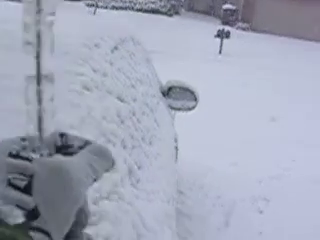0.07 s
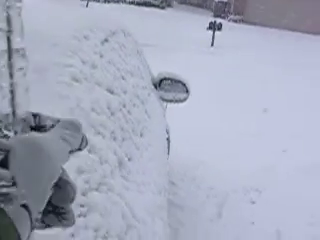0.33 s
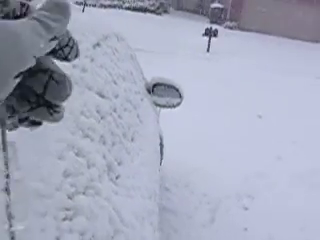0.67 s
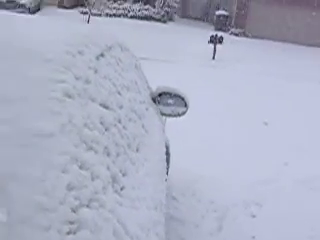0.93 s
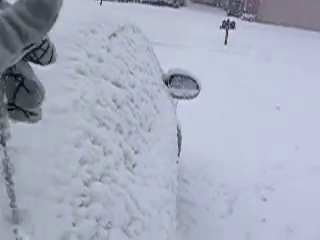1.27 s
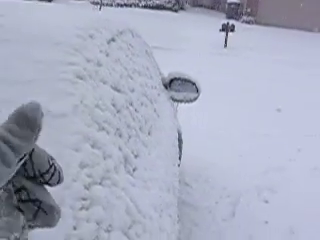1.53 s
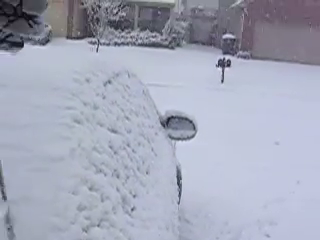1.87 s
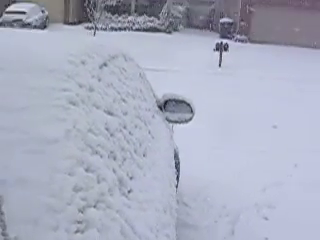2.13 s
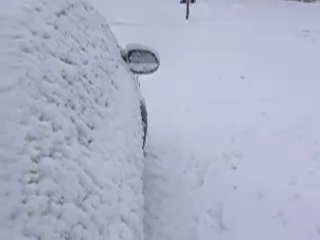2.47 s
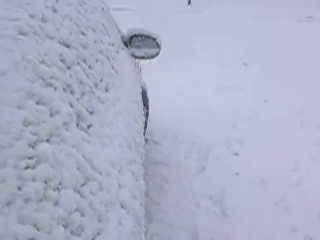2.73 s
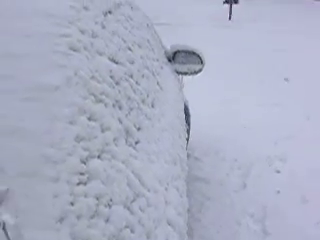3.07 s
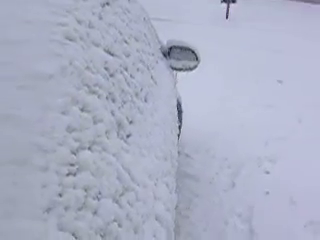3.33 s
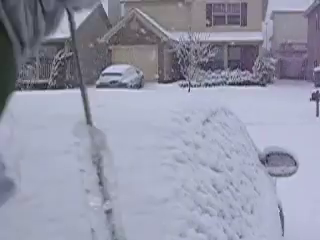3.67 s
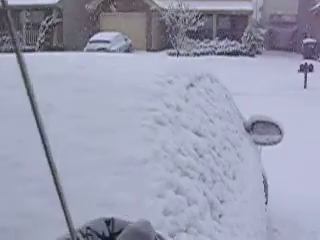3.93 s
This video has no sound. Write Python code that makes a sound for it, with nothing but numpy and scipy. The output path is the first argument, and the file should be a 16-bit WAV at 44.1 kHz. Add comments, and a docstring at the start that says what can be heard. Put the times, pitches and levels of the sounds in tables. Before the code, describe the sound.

Ice snaps and crumbles in uneven bursts while a glove scrapes along a car antenna, making the rod rattle briefly. The cracks grow sparser and softer later. Low wind buffets the close, dull-sounding microphone in a snowy yard.

```python
"""Stripping ice from a car antenna

A gloved hand rubs along the rod, close to a small camera in a snowy yard, while wind blows throughout.
The ice crumbles in crunches of tiny fractures and snaps in short dry cracks that set the rod ringing.
The camera passes only a narrow band, and the hardest cracks overload it."""
import sys
import numpy as np
from scipy import signal
from scipy.fft import rfft, irfft, next_fast_len
from scipy.io import wavfile

SR = 44100
rng = np.random.default_rng(int(sys.argv[2]) if len(sys.argv) > 2 else 0)


def log_audio(samples):
    """Write samples as a 16-bit WAV file to the path given in sys.argv[1]."""
    # one column per channel
    frames = np.atleast_2d(samples).T
    # limit to full scale, then quantise
    limited = np.clip(frames, -1, 1)
    pcm = np.round(limited * 32767).astype(np.int16)
    wavfile.write(sys.argv[1], SR, pcm)


N = 4 * SR


def amp(db):
    return 10 ** (np.asarray(db) / 20)


def unit_rms(x):
    return x / np.sqrt(np.mean(x ** 2) + 1e-20)


def unit_burst(x):
    """Scale x to the energy of 5 ms at rms 1."""
    return x / np.sqrt(np.sum(x ** 2) / (.005 * SR) + 1e-20)


def curve(rows):
    """Interpolate (seconds, value) rows to one value per sample."""
    return np.interp(np.arange(N) / SR, *np.transpose(rows))


def wobble(knots_per_s):
    """Straight lines between Gaussian random knots."""
    knots = rng.standard_normal(1024)
    return np.interp(np.arange(N) * knots_per_s / SR, np.arange(len(knots)), knots)


def coloured(x, colour):
    """Minimum-phase filter through (Hz, dB) points."""
    size = 4096
    hz, db = np.transpose(colour)
    gain = amp(np.interp(np.log(np.fft.rfftfreq(size, 1 / SR) + 1), np.log(hz), db))
    cepstrum = irfft(np.log(gain))
    cepstrum[1:size // 2] *= 2
    cepstrum[size // 2 + 1:] = 0
    response = irfft(np.exp(rfft(cepstrum)))
    return signal.oaconvolve(x, response)[:len(x)]


def noise(colour):
    return unit_rms(coloured(rng.standard_normal(N), colour))


def grains(colour, per_s, spread_db=4):
    """Tiny fractures: impulses of random time, sign and capped size, at rms 1."""
    hits = rng.random(N) < per_s / SR
    size = amp(spread_db * np.minimum(rng.standard_normal(N), 1))
    sign = rng.choice([-1, 1], N)
    return unit_rms(coloured(hits * sign * size, colour))


def random_slice(x, length):
    return x[rng.integers(N - length):][:length]


def add(track, start_s, sound):
    part = track[max(round(start_s * SR), 0):][:len(sound)]
    part += sound[:len(part)]


# Each row: time in seconds, level in dB before trim and flutter.
RUMBLE_LEVELS = [(0, -21), (0.05, -25), (0.14, -25), (0.19, -29), (0.28, -37), (0.36, -29), (0.55, -29),
                 (0.72, -30), (0.82, -26), (0.88, -29), (1.0, -27), (1.14, -30), (1.35, -31), (1.5, -31),
                 (1.64, -38), (1.72, -40), (1.76, -27), (1.83, -47), (2.03, -42), (2.18, -52), (2.36, -48),
                 (2.5, -41), (2.8, -39), (3.2, -39), (3.65, -36), (3.88, -35), (3.96, -29)]
# Each row: frequency in Hz, relative gain in dB.
RUMBLE_EQ = [(20, -32), (50, -14.5), (100, -7), (160, -1), (250, -1), (360, 0), (520, -6), (900, -18),
             (2000, -40)]


def wind_rumble(trim_db=.2, flutter_db=1.8):
    """Wind and handling buffet the microphone."""
    level = amp(curve(RUMBLE_LEVELS) + trim_db + flutter_db * wobble(knots_per_s=22))
    return level * noise(RUMBLE_EQ)


# Each row: time in seconds, level in dB before trim and flutter.
RUB_LEVELS = [(0.0, -33.0), (0.15, -35.0), (0.22, -36.0), (0.29, -33.0), (0.36, -30.0), (0.53, -29.0),
              (0.62, -32.0), (0.76, -30.0), (0.88, -36.0), (0.98, -37.0), (1.1, -32.0), (1.17, -29.0),
              (1.28, -29.0), (1.34, -33.0), (1.46, -29.0), (1.63, -38.0), (1.71, -36.0), (1.82, -41.0),
              (1.91, -41.0), (2.0, -35.0), (2.06, -32.0), (2.15, -47.0), (2.32, -46.0), (2.41, -45.0),
              (2.5, -42.0), (2.72, -39.0), (2.93, -40.0), (3.1, -36.0), (3.29, -37.0), (3.35, -32.0),
              (3.49, -34.0), (3.63, -40.0), (3.74, -31.0), (3.91, -33.0), (4.0, -27.0)]
# Each row: frequency in Hz, relative gain in dB.
RUB_EQ = [(150, -22), (350, -6), (540, -1), (740, 1), (930, 3), (1250, -6.5), (1650, -1.5), (2000, -9),
          (2450, -7), (2900, -12), (3300, -20), (3800, -23), (4500, -33)]
GRIT_EQ = [(100, -22), (330, -3), (750, 0), (950, 1), (1300, -3), (1700, 0), (2200, -2), (2900, -1),
           (3400, -10), (3900, -18), (4500, -32)]


def glove_rub(trim_db=-.6, flutter_db=1.5, grit_db=-6):
    """Sliding glove and wind make one fluttering hiss; the glove grinds crumbs of ice."""
    level = amp(curve(RUB_LEVELS) + trim_db + flutter_db * wobble(knots_per_s=45))
    hiss = noise(RUB_EQ)
    grit = amp(grit_db) * grains(GRIT_EQ, per_s=140)
    return level * (hiss + grit)


# Each row: start in seconds, hold in seconds, body level in dB, splinter ring in Hz, splinter level in dB.
ICE_CRUNCHES = [(0.103, 0.012, -28, 2960, -30), (0.119, 0.011, -25, 2960, -23),
                (0.241, 0.016, -33, 2400, -30), (0.303, 0.008, -31, 2770, -29),
                (0.313, 0.008, -27, 2770, -24), (0.381, 0.008, -28, 2170, -30),
                (0.572, 0.022, -26, 1960, -31), (0.639, 0.017, -30, 1660, -29),
                (0.79, 0.008, -30, 2130, -29), (1.043, 0.01, -29, 2930, -24),
                (1.164, 0.011, -29, 1670, -22), (1.19, 0.11, -29, 2200, -27.5),
                (1.423, 0.026, -22, 2210, -24), (1.478, 0.007, -36, 2220, -31),
                (1.499, 0.012, -24, 2500, -28), (1.529, 0.038, -20, 2000, -20),
                (1.567, 0.024, -27, 2650, -26), (1.641, 0.008, -33, 1600, -37),
                (1.743, 0.027, -27, 1550, -29), (1.779, 0.012, -27, 2700, -31),
                (1.848, 0.008, -40, 1660, -33), (1.962, 0.01, -34, 1710, -27), (2.04, 0.01, -34, 1980, -38),
                (2.242, 0.014, -43, 2430, -44), (2.419, 0.012, -25, 1830, -37),
                (2.442, 0.013, -31, 1640, -31), (2.463, 0.005, -36, 1950, -38),
                (3.215, 0.005, -37, 2570, -35), (3.24, 0.012, -30, 1780, -26),
                (3.324, 0.02, -35, 2300, -36), (3.366, 0.018, -28, 1700, -31),
                (3.403, 0.01, -44, 2370, -34), (3.443, 0.01, -33, 2620, -27),
                (3.563, 0.014, -31, 2000, -32), (3.668, 0.008, -30, 2100, -32),
                (3.732, 0.008, -31, 2310, -34), (3.774, 0.009, -28, 1770, -27),
                (3.793, 0.005, -27, 1770, -27), (3.84, 0.011, -30, 1770, -27),
                (3.954, 0.016, -26, 2130, -25)]
# Each row: frequency in Hz, relative gain in dB.
BODY_EQ = [(100, -24), (330, -4), (550, -3), (750, 1), (980, 1), (1400, -4), (2000, -18), (4500, -45)]
SPLINTER_EQ = [(300, -35), (1000, -12), (1650, 1), (2100, -2), (2800, -1), (3300, -10), (3900, -18),
               (4500, -32)]


def ice_crunches(rise_s=.0012, fall_s=.003, ring_db=-3):
    """Ice crumbles in dense runs of fractures: a dull body and splinters ringing near one pitch. The long row
    at 1.19 s is instead a stroke of the glove sliding along the rod, with the same grainy texture."""
    out = np.zeros(N)
    t = np.arange(SR // 5) / SR
    body_grains = grains(BODY_EQ, per_s=1800)
    splinter_grains = grains(SPLINTER_EQ, per_s=1800)
    for start_s, hold_s, body_db, ring_hz, splinter_db in ICE_CRUNCHES:
        hiss = unit_rms(random_slice(splinter_grains, len(t)))
        ring = unit_rms(signal.lfilter(*signal.iirpeak(ring_hz, Q=7, fs=SR), hiss))
        splinters = amp(splinter_db) * unit_rms(hiss + amp(ring_db) * ring)
        body = amp(body_db) * unit_rms(random_slice(body_grains, len(t)))
        envelope = (1 - np.exp(-t / rise_s)) * np.exp(-np.maximum(t - hold_s, 0) / fall_s)
        add(out, start_s, envelope * (body + splinters))
    return out


# Each row: start in seconds, low ring in Hz, its level in dB, high ring in Hz, its level in dB,
# seconds for the low ring to fall 30 dB, level of the after-shake (rattle and rod) in dB.
ICE_CRACKS = [(0.1871, 1350, -23, 1900, -23, 0.004, -33), (0.2435, 1300, -28, 2900, -26, 0.004, -35),
              (0.252, 1500, -26, 2900, -24, 0.005, -33), (0.3995, 1050, -22, 2800, -25, 0.006, -26),
              (0.4061, 1100, -18, 2050, -19, 0.007, -23), (0.4794, 990, -29, 2400, -23, 0.0025, -35),
              (0.4837, 1250, -24, 3000, -30, 0.0025, -35), (0.4906, 1650, -11, 2430, -17, 0.007, -29),
              (0.4932, 1150, -18, 2430, -14, 0.012, -26), (0.568, 850, -23, 2400, -21, 0.004, -25),
              (0.7341, 840.0, -30.0, 1740.0, -32.0, 0.009, -29.0), (0.8106, 780, -9, 2230, -28, 0.006, -21),
              (0.8224, 460, -17.5, 1960, -34, 0.018, -24), (0.8518, 420, -31, 3150, -26, 0.011, -31),
              (1.0118, 1150, -23, 2600, -33, 0.006, -28), (1.0187, 1100, -10, 1640, -14.5, 0.009, -21),
              (1.0245, 1000, -19, 2110, -30, 0.01, -25),
              (1.1572, 900.0, -21.0, 1830.0, -31.0, 0.007, -20.0),
              (1.347, 1010.0, -23.0, 2220.0, -22.0, 0.003, -34.0), (1.503, 760, -14, 1950, -22, 0.009, -25),
              (1.5075, 760, -19, 2180.0, -30.0, 0.008, -24.0), (1.5255, 720, -16, 1740, -25, 0.007, -25),
              (1.5304, 730, -16, 1720, -19, 0.014, -23), (1.5372, 950, -16, 1720, -13, 0.01, -24),
              (1.5435, 600, -22, 2450, -19, 0.011, -27), (1.5503, 1020, -19, 1700, -16, 0.014, -25),
              (1.5539, 530, -15, 2100, -20, 0.016, -24), (1.5628, 840, -12.5, 1950, -22, 0.007, -32),
              (1.5655, 1150, -15.5, 1800, -14, 0.007, -28),
              (1.5943, 770.0, -30.0, 1890.0, -31.0, 0.01, -34.0), (1.672, 850, -18, 1900, -23, 0.006, -26),
              (1.6825, 950, -14, 2450, -19, 0.007, -22), (1.7523, 930, -15, 1620, -18, 0.003, -25),
              (1.7555, 370, -20, 1750, -34, 0.03, -36), (1.789, 1120, -9.3, 1700, -18, 0.004, -31),
              (1.7905, 90, -25, 1750, -36, 0.03, -38), (1.7922, 1180, -16, 2700, -25, 0.007, -26),
              (1.8836, 1400.0, -32.0, 1830.0, -24.0, 0.005, -34.0),
              (1.938, 1100.0, -19.0, 1730.0, -24.0, 0.005, -34.0),
              (2.0211, 860.0, -29.0, 1680.0, -38.0, 0.006, -37.0),
              (2.0652, 950, -22, 2450, -22, 0.004, -30), (2.0698, 950, -13.5, 2450, -20, 0.004, -25),
              (2.0853, 850, -18, 2300, -19.5, 0.009, -29), (2.0895, 800, -8, 2140, -30, 0.011, -26),
              (2.1186, 880.0, -38.0, 1980.0, -31.0, 0.005, -41.0),
              (2.3565, 1130, -18.5, 1570, -34, 0.0025, -42),
              (2.3759, 960.0, -32.0, 1560.0, -39.0, 0.008, -44.0),
              (2.4291, 740.0, -23.0, 1700.0, -36.0, 0.008, -33.0), (2.569, 850, -29, 1800, -26, 0.01, -37),
              (2.6422, 1720, -23, 2620, -22, 0.008, -35),
              (2.7573, 690.0, -18.0, 2090.0, -37.0, 0.007, -33.0),
              (2.7682, 600.0, -26.0, 1920.0, -36.0, 0.008, -33.0),
              (2.8378, 2300, -26, 2850, -21.5, 0.009, -38),
              (2.8747, 780.0, -26.0, 1700.0, -35.0, 0.01, -31.0),
              (3.0163, 1230.0, -26.0, 2500.0, -25.0, 0.006, -35.0),
              (3.057, 1000, -42, 2900, -34, 0.008, -44), (3.246, 1070.0, -31.0, 2220.0, -27.0, 0.01, -32.0),
              (3.5202, 1000, -17.5, 2480, -19.5, 0.007, -29), (3.5228, 800, -19, 1640, -19, 0.01, -25),
              (3.6752, 950, -20, 2250, -22, 0.007, -25), (3.941, 300, -22, 1700, -38, 0.025, -36),
              (3.9566, 1030.0, -26.0, 2110.0, -24.0, 0.009, -25.0)]
# Each row: mode of the iced rod in Hz, level in dB re the after-shake, seconds to fall 30 dB.
ROD_MODES = [(360, -5, .06), (535, -6, .05), (752, -4, .04), (985, -8, .03), (1640, -8, .035),
             (1712, -8, .035), (2430, -10, .02)]
# Each row: frequency in Hz, relative gain in dB.
SNAP_EQ = [(60, -26), (300, -9), (800, 0), (1600, 0), (2700, -1), (3400, -10), (3900, -19), (4500, -34)]
RATTLE_EQ = [(60, -20), (200, -9), (360, -1), (520, -4), (750, 1), (1000, 1), (1350, -4), (1700, -5),
             (2400, -9), (3200, -19), (4500, -30)]


def ice_cracks(snap_re_high_db=-6, rattle_re_shake_db=1, high_fade_ratio=.85):
    """Ice snaps or the hand knocks the rod: a click, two damped rings, then rattle and rod modes."""
    out = np.zeros(N)
    t = np.arange(SR // 10) / SR
    rattle_noise = noise(RATTLE_EQ)
    jitter_lowpass = signal.butter(2, 700, fs=SR, output="sos")
    jitter = unit_rms(signal.sosfilt(jitter_lowpass, rng.standard_normal(N)))
    click = unit_burst(coloured(signal.unit_impulse(len(t)), SNAP_EQ))

    def ring(hz, fade_s, rise_cycles=.9, jitter_rad=.42):
        """The breaking piece rings with an unsteady phase."""
        envelope = (1 - np.exp(-t * hz / rise_cycles)) * amp(-30 * t / fade_s)
        phase = 2 * np.pi * hz * t + jitter_rad * random_slice(jitter, len(t))
        return unit_burst(envelope * np.sin(phase))

    def shake(x, fade_s, rise_s=.002):
        """Splinters or rod build up and die away after the crack."""
        envelope = (1 - np.exp(-t / rise_s)) * amp(-30 * t / fade_s)
        return unit_burst(envelope * x)

    for start_s, low_hz, low_db, high_hz, high_db, fade_s, shake_db in ICE_CRACKS:
        snap = amp(high_db + snap_re_high_db) * click
        low = amp(low_db) * ring(low_hz, fade_s)
        high = amp(high_db) * ring(high_hz, fade_s * high_fade_ratio)
        rod = np.zeros(len(t))
        for mode_hz, mode_db, mode_fade_s in ROD_MODES:
            mode = np.sin(2 * np.pi * (mode_hz * t + rng.random()))
            rod += amp(mode_db) * shake(mode, mode_fade_s)
        rattle = amp(rattle_re_shake_db) * shake(random_slice(rattle_noise, len(t)), fade_s=.028)
        add(out, start_s, snap + low + high + amp(shake_db) * (rattle + rod))
    return out


def scene():
    """Mono, close and dry: the snow returns no echo."""
    return (ice_cracks() + ice_crunches() + glove_rub() + wind_rumble())[None]


def record(dry, band_hz=4050, bias=-.05, ceiling=.72, knee=24, top_hz=16000):
    """The camera keeps a narrow band; overloaded peaks flatten and spit a little treble."""
    size = next_fast_len(N + SR // 4)
    hz = np.fft.rfftfreq(size, 1 / SR)
    band_gain = 1 / np.sqrt(1 + (hz / band_hz) ** 60)
    narrow = irfft(rfft(dry, size) * band_gain, size)[:, :N]
    biased = narrow + bias
    clipped = biased / (1 + np.abs(biased / ceiling) ** knee) ** (1 / knee)
    return irfft(rfft(clipped, size) * (hz < top_hz), size)[:, :N]


dry = scene()
out = record(dry)
log_audio(out)
```